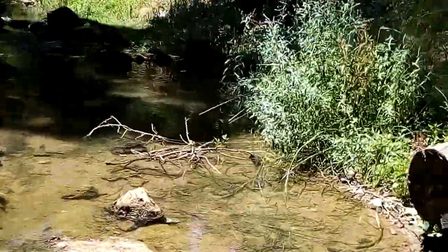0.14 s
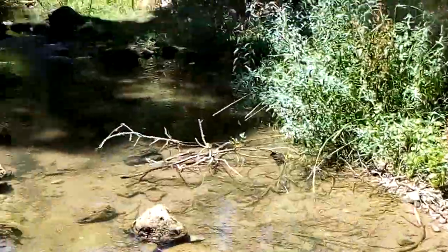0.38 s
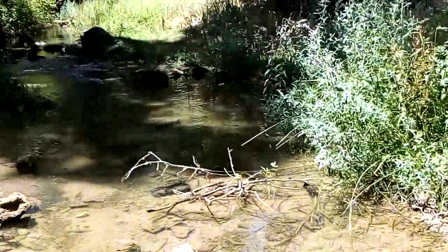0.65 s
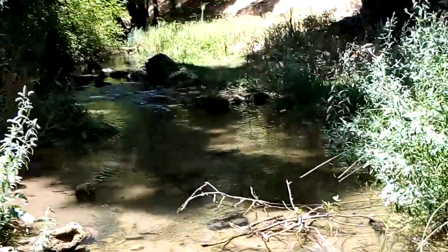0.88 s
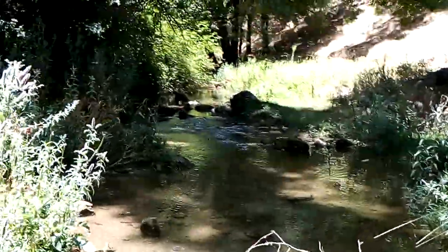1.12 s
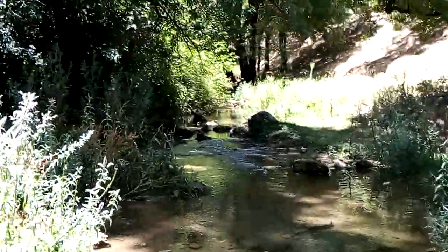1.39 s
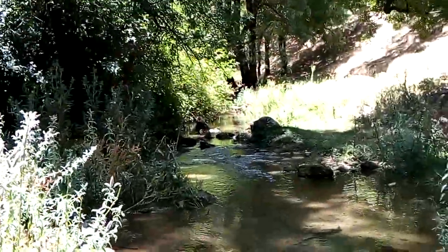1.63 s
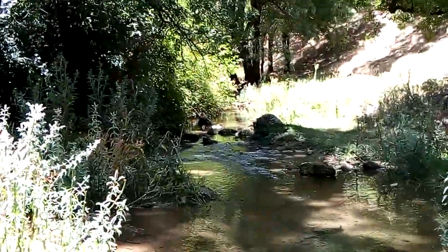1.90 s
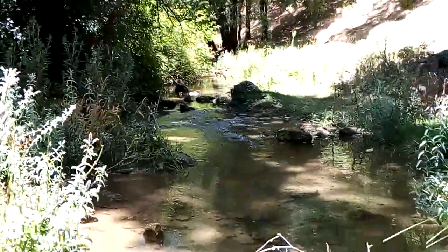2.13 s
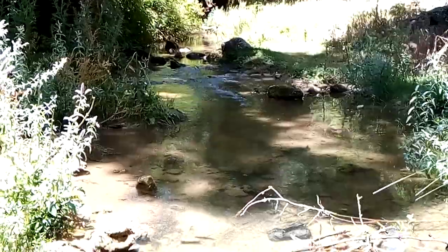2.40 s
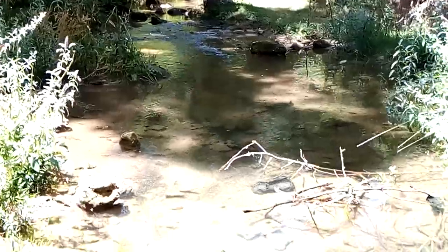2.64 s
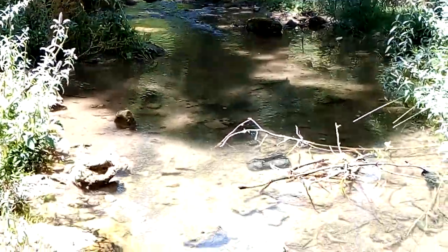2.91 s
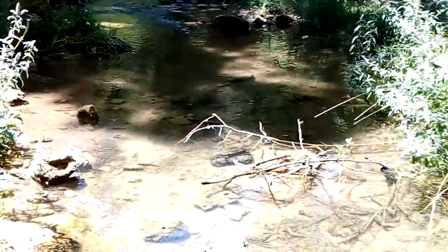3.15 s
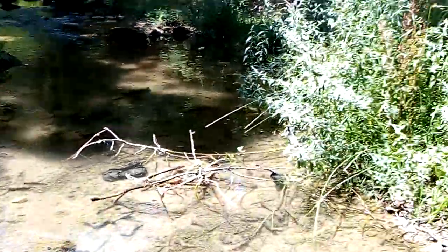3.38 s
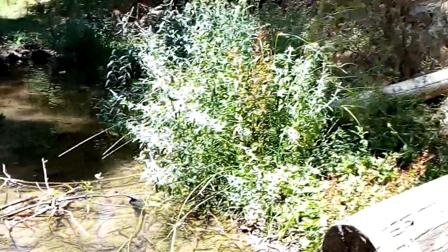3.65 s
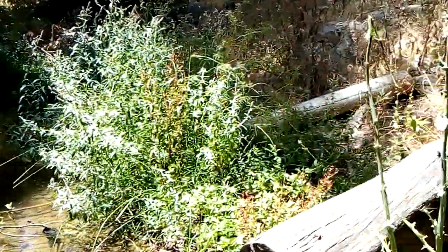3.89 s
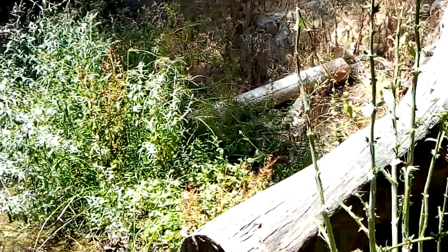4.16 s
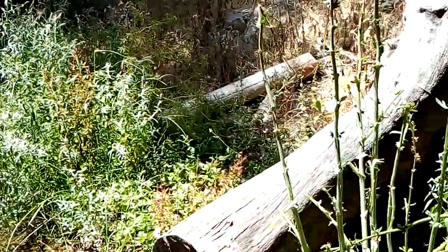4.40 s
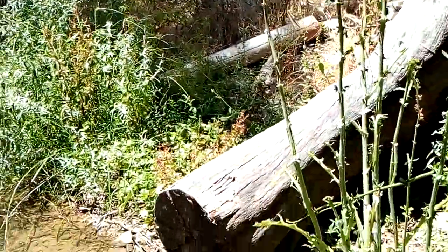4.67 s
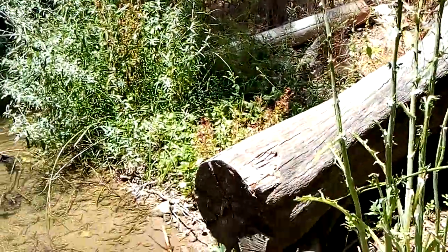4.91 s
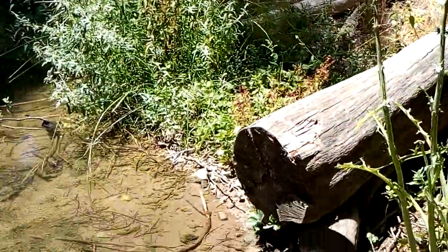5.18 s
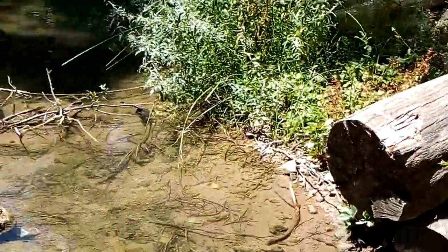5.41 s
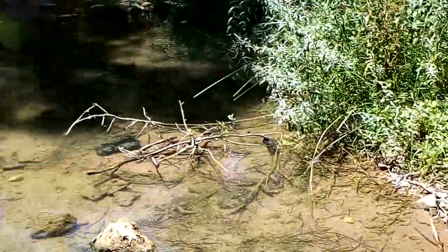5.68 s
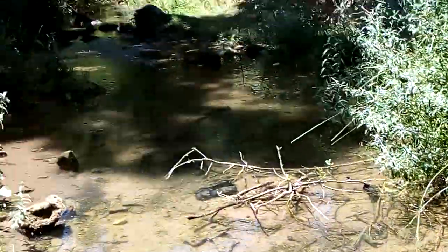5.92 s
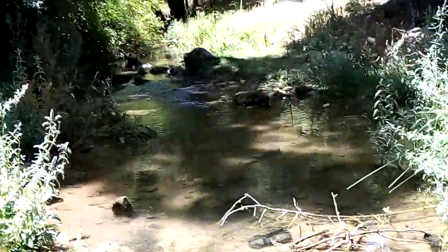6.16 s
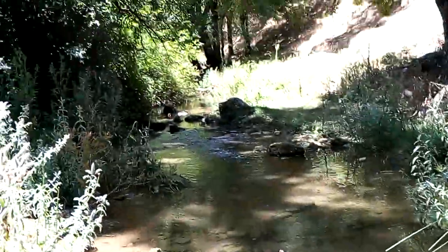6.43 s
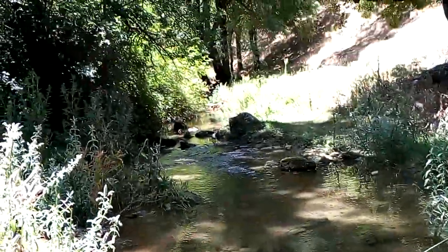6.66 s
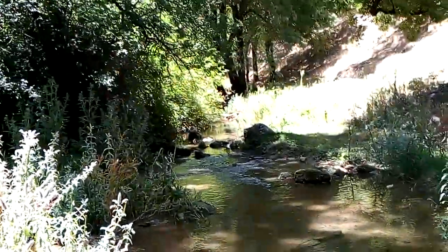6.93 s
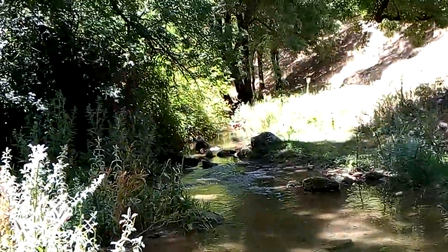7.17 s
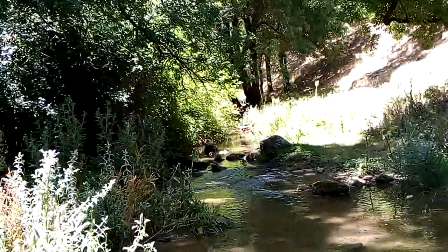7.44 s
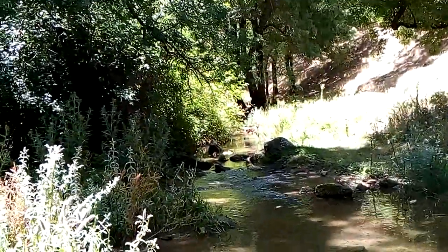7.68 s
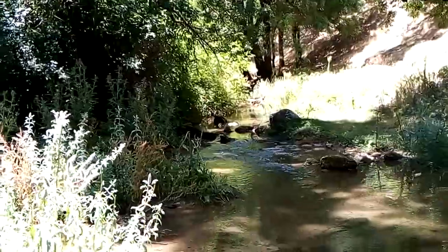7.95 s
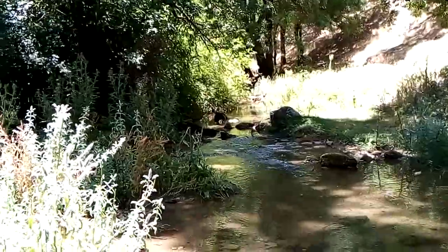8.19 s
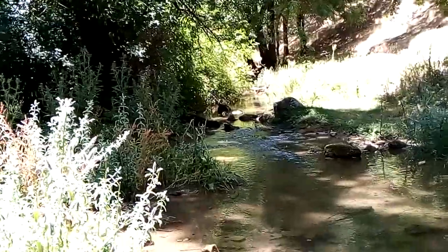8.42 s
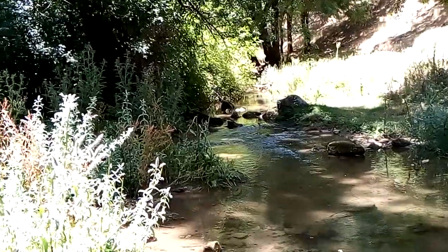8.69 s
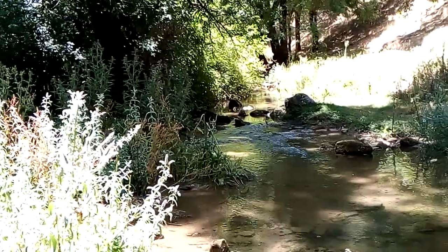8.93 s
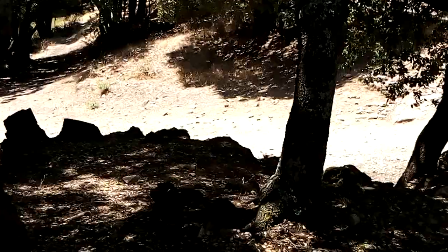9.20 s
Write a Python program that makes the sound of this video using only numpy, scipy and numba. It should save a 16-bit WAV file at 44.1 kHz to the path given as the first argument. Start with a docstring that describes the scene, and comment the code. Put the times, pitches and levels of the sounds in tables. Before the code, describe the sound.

A loud, hard click opens, with low wind thuds on the microphone for about a second. A shallow stream rushes steadily, gurgling low and popping brightly. It softens around the middle as the small hand-held camera turns away, then regains level. Near nine seconds the sound drops out, the water flickers back, then a quiet wood follows with faint rustle, clicks and a wind puff.

```python
"""A button clicks and wind buffets a small hand-held camera beside a shallow stream over stones in a wood.
The stream is ringing bubbles over a noise wash: big ones gurgle, small ones fizz and pop in the microphone port.
It weakens and regains level as the camera turns away and back. Near the end the sound drops out, the stream
returns for a moment, then shaped noise makes a quiet wood, with a faint rustle, more clicks and more wind."""
import sys
import numpy as np
from scipy import signal
from scipy.fft import rfft, irfft, next_fast_len
from scipy.io import wavfile
from scipy.ndimage import uniform_filter1d
from numba import njit

SR = 44100
rng = np.random.default_rng(int(sys.argv[2]) if len(sys.argv) > 2 else 0)


def output_pcm(signal):
    """Save a mono or channel-first signal as 16-bit PCM at the path in sys.argv[1].

    Samples are clipped to [-1, 1] before scaling.
    """
    pcm = np.clip(np.atleast_2d(signal).T, -1, 1) * 32767
    wavfile.write(sys.argv[1], SR, np.round(pcm).astype(np.int16))


def volts_from_db(level):
    """Convert decibel levels to linear amplitude ratios."""
    exponent = np.asarray(level, float) / 20
    return 10 ** exponent


N = 411001
T = np.arange(N) / SR


def unit(x):
    """Normalisation: scale x to a root-mean-square value of 1."""
    return x / np.sqrt(np.mean(x ** 2))


def colour(x, points):
    """Linear filtering: weight the spectrum of x by (Hz, dB) points, joined along log frequency."""
    hz, db = np.transpose(points)
    size = next_fast_len(N)
    f = np.arange(1, size // 2 + 2) * SR / size
    gain = volts_from_db(np.interp(np.log(f), np.log(hz), db))
    return irfft(rfft(x, size) * gain, size)[:N]


def below(x, hz):
    """Zero-phase low-pass: filtering forwards and backwards cancels the delay."""
    return signal.sosfiltfilt(signal.butter(3, hz, fs=SR, output="sos"), x)


def walk(rate):
    """Slow random modulation: levels held 1 / rate s and smoothed twice, with a spread of about 0.7."""
    k = int(SR / rate)
    held = np.repeat(rng.standard_normal(N // k + 1), k)
    return uniform_filter1d(uniform_filter1d(held, k), k)[:N]


def step(s):
    """Switching: 0 before s, 1 a fraction of a millisecond after."""
    return np.clip((T - s) / .00005, 0, 1)


@njit
def ring(n, s, hz, gain, cycles, glide, phase):
    """Damped resonance: each grain swells, peaks after twice `cycles` periods and dies as its pitch rises."""
    out = np.zeros(n)
    for e in range(len(s)):
        start, span, p = int(s[e] * SR), cycles[e] * SR / hz[e], phase[e]
        for i in range(min(int(12 * span), n - start)):
            u = i / span  # time in spans; the pitch rises by the fraction `glide` per span
            p += 2 * np.pi * min(hz[e] * (1 + glide[e] * u) / SR, .45)
            envelope = (u * np.exp(1 - u / 2) / 2) ** 2
            out[start + i] += gain[e] * envelope * np.sin(p)
    return out


def play(events, cycles, glide):
    """Superposition of single resonances: ring a table of (s, peak dB, starting Hz)."""
    s, db, hz = np.transpose(events)
    length, phase = rng.random((len(s), 2)).T
    return ring(N, s, hz, volts_from_db(db), cycles * (0.67 + 0.28 * length), glide + 0 * s, 2 * np.pi * phase)


def swarm(count, lo_hz, hi_hz, cycles, glide, scatter_db):
    """Random superposition of bubbles: the smaller the bubble, the higher and shorter it rings."""
    when, size, length, phase, loud = rng.random((count, 5)).T
    hz = lo_hz * (hi_hz / lo_hz) ** size
    # peaks grow with pitch, since high bubbles are short; a few stand far out
    gain = hz * volts_from_db(-scatter_db * np.log(1.015 - loud))
    return unit(ring(N, when * N / SR, hz, gain, cycles * (.5 + length), glide * length, 2 * np.pi * phase))


def water_wash():
    """Incoherent summation: countless far bubbles blur into noise, with nearer bubbles and drops on top."""
    # Spectrum of water through the microphone. Each row: frequency in Hz, gain in dB.
    water_spectrum = [(30, -37.5), (90, -31), (130, -25), (190, -15), (260, -4.5), (350, 1.5), (450, -1.5),
                      (720, -1.5), (1050, -5.5), (2900, -6), (4200, -3), (5300, 0.5), (6500, -5),
                      (8000, -29), (10000, -41), (12000, -50.5), (13800, -48), (15100, -36), (15700, -35.5),
                      (16000, -86)]
    big = swarm(count=2500, lo_hz=250.5, hi_hz=1191, cycles=1.77, glide=0.1174, scatter_db=1.5)
    small = swarm(count=15000, lo_hz=1203, hi_hz=7490, cycles=1.0, glide=0.033, scatter_db=3.0)
    drop_size = volts_from_db(2.6 * np.minimum(rng.exponential(size=N), 7))
    drops = (rng.random(N) < .03) * drop_size * rng.choice([-1, 1], N)
    mixture = rng.standard_normal(N) + volts_from_db(-16) * big + volts_from_db(-7.0) * small + volts_from_db(-7) * unit(drops)
    return colour(mixture, water_spectrum)


def moving_water():
    """Directional shading and modulation: turning and surges act on each frequency band in its own measure."""
    # Edges in Hz between rumble, deep gurgle, gurgle, high gurgle, rush, fizz and spray.
    split_hz = (170, 480, 700, 1100, 3600, 11500)
    # Those bands, low to high. Each row: level in dB when faced, share of the turning loss,
    # share of the treble change and the fizz swells, flicker in dB per unit of walk.
    bands = [(-71.5, 0.44, 0, 4), (-54.5, 0.39, 0.16, 1.6), (-53, 0.97, 0.15, 0.3), (-52.5, 1.13, 0.34, -1),
             (-44.5, 1.14, 0.013, 0.1), (-41.5, 1.12, 0.95, 0.5), (-82, 0.9, 0.62, 2.2)]
    # The camera turns from the riffle and back. Each row: time in seconds, loss in dB
    # and extra treble in dB, both before each band's share.
    turn = [(0, 1.5, -2), (0.5, 1, -2), (1.2, -0.5, 0), (3.2, 0, -1), (3.9, -3.5, 2), (4.3, -4.5, 0),
            (5.05, -4.5, 0), (5.5, -1.5, -0.5), (5.9, 0, -2), (6.6, -0.5, 0.5), (8.2, 0, 0),
            (8.35, 0.5, -6), (9.2, 2, -4.5)]
    # Swells of the fizz. Each row: centre in seconds, lift in dB before each band's share,
    # half width (standard deviation) in seconds.
    surges = [(.1, 1, 0.058), (.98, 2, .07), (1.32, 2, 0.012), (.42, 2.5, .03), (.8, 2, .04),
              (1.65, 2, .02), (1.72, 2, .025), (1.8, 1.5, .04), (2.27, 2, .012), (2.32, 1.5, .018),
              (2.42, 2, .015), (2.68, 2, 0.025), (3.08, 1, 0.044), (3.3, 1, 0.017), (3.4, 1, 0.027),
              (3.7, 1, .1), (5.3, 0.5, .06), (6.7, 1.5, 0.061), (6.86, 2.5, 0.026), (6.99, 1.5, 0.045),
              (7.78, 1, 0.045), (7.94, 1.5, 0.034), (8.03, 2, 0.033), (8.16, 2.5, 0.027), (8.28, 3, .02)]
    water = water_wash()
    parts = np.diff([0 * water, *(below(water, hz) for hz in split_hz), water], axis=0)
    s, loss_db, treble_db = np.transpose(turn)
    surge_db = 0.44 * walk(24) + 0.75 * walk(50)  # shared by all bands
    fizz_db = sum(db * np.exp(-((T - at) / half) ** 2 / 2) for at, db, half in surges)
    out = 0
    for part, (db, shade, bright, flicker_db) in zip(parts, bands):
        turn_db = np.interp(T, s, shade * loss_db + bright * treble_db)
        level_db = db + turn_db + bright * fizz_db + surge_db + flicker_db * walk(26)
        out = out + unit(part) * volts_from_db(level_db)
    return out


def near_bubbles():
    """Bubble resonance: large bubbles ring low and small ones high; some sweep upwards near the surface."""
    # Single bubbles that stand out, then bubbles that near the surface, then tiny drops that tick above the fizz.
    # Each row: start in seconds, peak level in dB before filtering, starting pitch in Hz.
    bubbles = [(2.047, -49, 232), (4.76, -54, 231), (5.108, -55, 234), (5.859, -49, 236), (6.349, -52, 169),
               (6.853, -47.5, 234), (8.82, -55, 176), (1.04, -34.5, 654), (1.416, -37, 888),
               (1.46, -34.5, 613), (1.545, -36, 340), (1.756, -35, 670), (1.898, -41.5, 300),
               (2.079, -36.5, 755), (2.351, -34, 785), (2.613, -36, 825), (2.735, -38, 440),
               (2.834, -36, 840), (3.171, -39, 646), (3.455, -38.5, 390), (3.606, -39, 720),
               (4.719, -40, 555), (5.535, -40, 581), (5.666, -39, 517), (5.717, -37, 606),
               (5.809, -36, 810), (6.003, -37, 729), (6.119, -37, 755), (6.422, -42, 802),
               (6.842, -36, 760), (7.236, -37, 684), (7.369, -36, 719), (7.464, -39, 595), (7.88, -36, 834),
               (8.097, -39, 750), (8.435, -37.5, 404), (8.554, -36, 740), (8.804, -37, 644),
               (8.926, -38, 353), (0.168, -40.5, 445), (0.17, -41, 250), (0.23, -39.5, 333),
               (.36, -38, 950), (.49, -38, 650), (0.42, -36, 620), (0.512, -36.5, 333), (0.635, -46, 326),
               (0.868, -32, 890), (0.925, -40, 495), (0.675, -33.5, 630), (0.864, -39, 570),
               (0.957, -34, 697), (1.231, -36, 544), (1.313, -37, 477), (2.005, -41, 595),
               (3.41, -33.5, 795), (6.222, -35, 600), (6.355, -34, 600), (6.985, -34, 600),
               (7.078, -34.5, 815), (8.731, -32, 650), (0.0743, -30, 2610), (0.417, -30, 2080),
               (0.8804, -31, 2900), (2.3935, -33, 2060), (2.5004, -33, 2990), (2.7987, -37, 2200),
               (3.0497, -36, 1670), (5.2306, -31, 2030), (6.1207, -31, 3240), (6.2368, -35, 2300),
               (6.373, -29.5, 2030), (6.7468, -32, 2800), (7.1213, -31, 3310), (7.3268, -27, 3440),
               (7.4397, -32, 3360), (7.4986, -33, 1910), (8.0681, -25, 3460), (8.4517, -27, 3200),
               (8.4807, -32, 2110), (8.9138, -32, 3000), (0.439, -25, 5350), (0.6619, -32, 4910),
               (.6749, -31, 4880), (.8286, -21, 5850), (1.8478, -28, 5300), (7.697, -26, 5250),
               (7.7693, -26, 5120), (7.9735, -28, 4400), (1.7681, -21, 4890), (1.7903, -22, 5350),
               (1.8262, -23, 4930), (1.9066, -24, 5310), (1.951, -26, 3600), (2.2628, -24, 5310),
               (2.268, -26, 3720), (2.285, -25, 3800), (2.3159, -18.5, 4960), (2.4206, -25, 4220),
               (2.6474, -20, 4950), (2.6903, -22.5, 5400), (3.1564, -24, 5590), (3.2954, -23, 5450),
               (3.3119, -23.5, 5040), (3.4066, -22, 5300), (3.4106, -24, 5890), (3.4115, -27, 4000),
               (3.853, -30, 4000), (4.1083, -31, 4840), (4.124, -29, 4800), (4.335, -29, 5000),
               (4.465, -30, 5000), (4.84, -32, 6500), (5.01, -30, 5000), (4.9675, -29, 4060),
               (5.7246, -29, 5850), (6.0551, -22.5, 5360), (6.2572, -26, 4180), (6.4188, -22, 5750),
               (6.541, -28, 3620), (6.6538, -19.5, 5390), (6.8334, -25, 5320), (6.851, -21, 4600),
               (6.9611, -24, 5390), (7.0311, -30, 5300), (7.198, -24, 4560), (7.2913, -22, 5080),
               (7.6036, -24, 4560), (7.6794, -30, 5200), (8.0905, -24, 4670), (8.1469, -27, 5100),
               (8.27, -20, 5800)]
    risers = [(4.32, -43.5, 350), (4.487, -43.5, 344), (4.61, -45, 338), (4.642, -49, 795),
              (4.838, -44, 570), (4.935, -45, 627), (5.12, -48, 477), (5.455, -46, 705), (6.34, -37, 480),
              (6.98, -38, 478)]
    spray = [(0.6928, -60, 8890), (0.8799, -56, 9820), (1.5279, -59, 8560), (4.8344, -71, 9150),
             (7.4919, -59, 8500), (8.1524, -63, 8540), (8.4432, -64, 9880)]
    through_port = below(play(bubbles, 1.29, 0.0076) + play(risers, 2.2, 0.17), 7000)
    return through_port + play(spray, 2.5, 0)


def stream():
    """Superposition of sources: nearby bubbles and spray stand out of the moving water."""
    return moving_water() + near_bubbles()


def wind():
    """Turbulent pressure: each buffet thuds the diaphragm at its own pitch, over rumble that swells with it."""
    # Wind buffets on the port. Each row: time of the peak in seconds, peak level of the thud in dB,
    # half width (standard deviation) in seconds, pitch at the peak in Hz, glide in Hz per second.
    buffets = [(.145, -46, .0057, 200, 0), (.18, -45, .008, 85, 0), (.247, -41, .0075, 175, -2500),
               (.275, -43, .008, 95, -500), (.295, -43, .008, 125, 2000), (.32, -47, .006, 120, 0),
               (.37, -40, .006, 155, -3000), (.395, -48, .008, 110, 0), (.46, -38, .009, 140, 4500),
               (.525, -43, .007, 140, -2000), (.547, -49, .0074, 80, 0), (.645, -39.5, .0065, 180, -3000),
               (.657, -40, .007, 100, -1000), (.755, -42, .007, 150, 2000), (.765, -40, .008, 125, -2000),
               (.8, -54, .0074, 101, 0), (.845, -46, .006, 90, 0), (.874, -37, .006, 95, 0),
               (0.871, -47, .0036, 200, 0), (.935, -51, .006, 100, 0), (.965, -57, .006, 80, 0),
               (9.228, -43.5, .0094, 110.3, 0), (9.246, -37.5, .0045, 165, 3000)]
    # Spectrum of the turbulence. Each row: frequency in Hz, gain in dB.
    wind_spectrum = [(20, -23), (45, -13), (90, -5), (170, -8), (280, -6.5), (550, -29), (1500, -64)]
    swell = thud = 0
    for (s, db, half, hz, glide), phase in zip(buffets, rng.random(len(buffets))):
        t = T - s
        shape = volts_from_db(db) * np.exp(-(t / half) ** 2 / 2)
        swell = swell + shape
        thud = thud + shape * np.sin(2 * np.pi * ((hz + glide * t / 2) * t + phase))
    lull = volts_from_db(-58) * np.exp(-((T - .55) / 0.52) ** 4)  # faint rumble between the early buffets
    rumble = colour(rng.standard_normal(N), wind_spectrum)
    # eddies in a swell are of even strength
    rumble = rumble / np.sqrt(uniform_filter1d(rumble ** 2, int(.025 * SR)))
    return thud + (volts_from_db(-11) * swell + lull) * rumble


def body_clicks():
    """Impulse response: a click of the camera body is a sum of briefly ringing resonances."""
    # Each row: start in seconds, peak level in dB, starting pitch in Hz.
    clicks = [(.02902, -3.5, 5340), (.0291, -32, 1490), (.0292, -40, 10100), (.0292, -46, 15000),
              (.0298, -17, 4300), (9.2005, -41, 2560), (9.201, -44, 5000), (9.229, -50, 4500),
              (9.3166, -46, 5000), (9.2289, -43, 2200), (9.3164, -47, 2540)]
    return play(clicks, 0.88, 0.0011)


def thin_hiss():
    """Exponential decay: a faint flickering hiss, mostly above 8 kHz, dies away in the first moments."""
    # Each row: frequency in Hz, gain in dB.
    hiss_spectrum = [(6000, -31), (8500, 4), (11000, -3), (13500, -10), (15200, 2), (15700, 7),
                     (16000, -51)]
    level, fade_s = volts_from_db(-65.5 + 2.5 * walk(25)), 0.15
    return unit(colour(rng.standard_normal(N), hiss_spectrum)) * level * np.exp(-T / fade_s)


def wood():
    """Ambient noise: the still air of the second place is shaped noise; a faint rustle sets in at the end."""
    # Spectra of the air and of the rustle. Each row: frequency in Hz, gain in dB.
    air_spectrum = [(18, -39), (30, 0), (149, -2), (233, -26), (364, -8), (1160, -13), (5500, -12.5),
                    (6800, -35), (9000, -47.5), (13500, -49), (15200, -43), (15700, -40), (16000, -85.5)]
    rustle_spectrum = [(2500, -25), (5000, -2), (7500, -6), (10000, -19), (11500, -40)]
    rustle = unit(colour(rng.standard_normal(N), rustle_spectrum)) * volts_from_db(-60) * step(9.28)
    air = unit(colour(rng.standard_normal(N), air_spectrum)) * volts_from_db(-56.5 + 2.4 * walk(30))
    return air + rustle


def scene():
    """Linear superposition: the stream gives way to the wood, with wind, hiss and clicks added."""
    change = step(9.1852)  # change of place, in seconds
    place = stream() * (1 - change) + wood() * change
    return (place + wind() + thin_hiss() + body_clicks())[None]


@njit
def limit(x, top, hold, release, slope):
    """Delayed gain control: after a loud peak the gain ducks a moment later and recovers."""
    y, e = np.empty(len(x)), 0.
    for i in range(len(x)):
        e = max(e * release, abs(x[max(i - hold, 0)]))
        y[i] = x[i] * min(1., top / (e + 1e-9)) ** slope
    return y


def low_pass(x):
    """Removes everything above the highest recorded frequency."""
    return signal.sosfilt(signal.butter(12, 16640, fs=SR, output="sos"), x)


def record(dry):
    """Signal chain: gain control, the drop-out, then a steep band limit."""
    hold, release = int(.0016 * SR), np.exp(-1 / (.025 * SR))  # 1.6 ms delay, 25 ms recovery
    ducked = limit(dry[0], volts_from_db(-17.), hold, release, .5)
    on = (T < 8.9925) + step(9.1432)  # silent between these seconds
    band_limit = signal.ellip(10, .2, 60, 15720, fs=SR, output="sos")
    cut = signal.sosfilt(band_limit, ducked * on)
    return low_pass(cut[None])


dry = scene()
out = record(dry)
output_pcm(out)
```